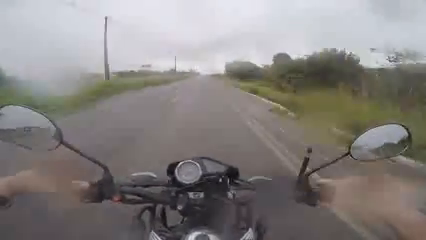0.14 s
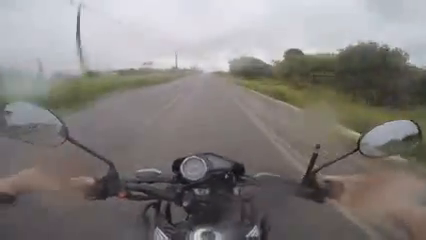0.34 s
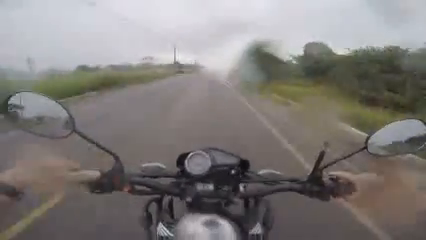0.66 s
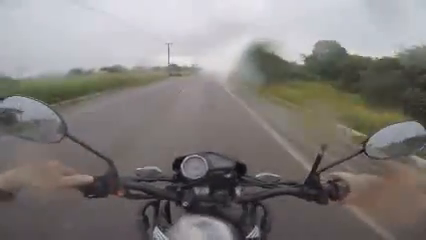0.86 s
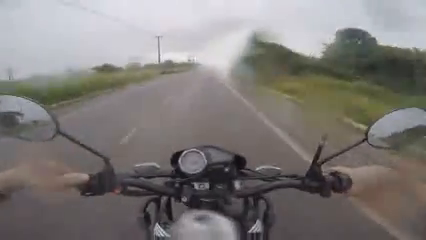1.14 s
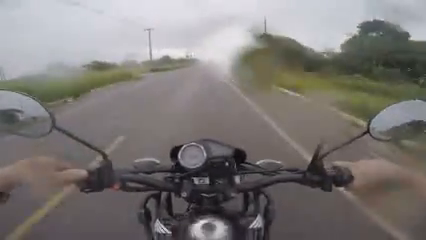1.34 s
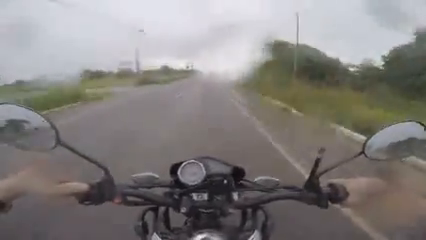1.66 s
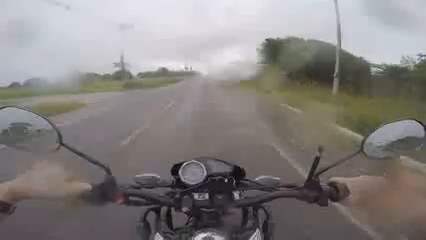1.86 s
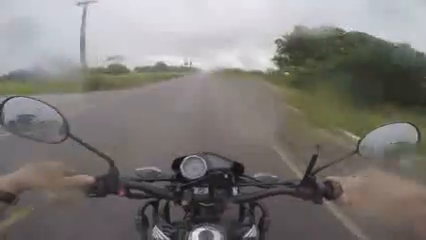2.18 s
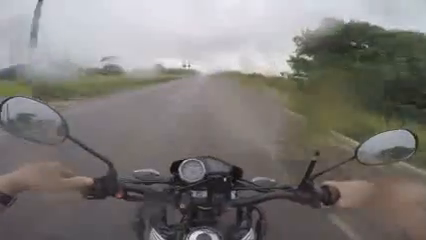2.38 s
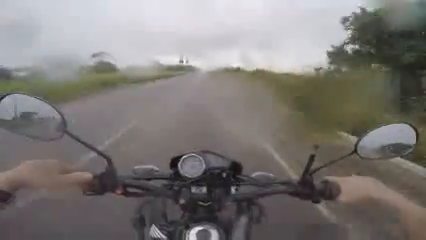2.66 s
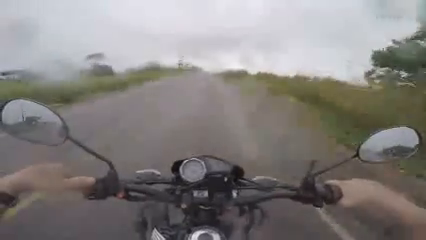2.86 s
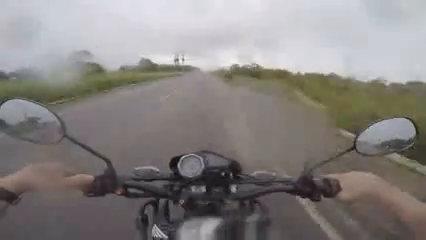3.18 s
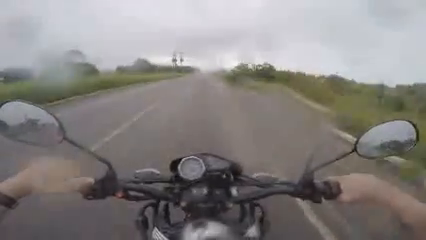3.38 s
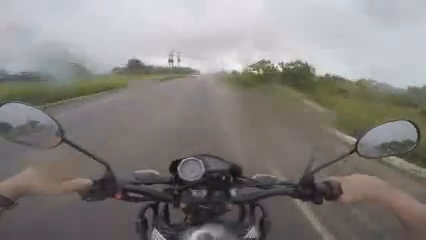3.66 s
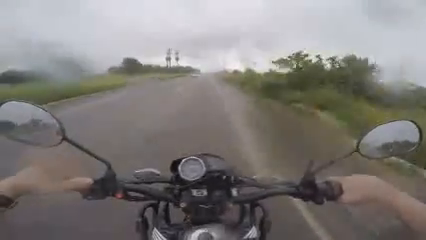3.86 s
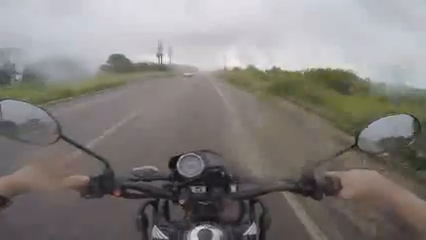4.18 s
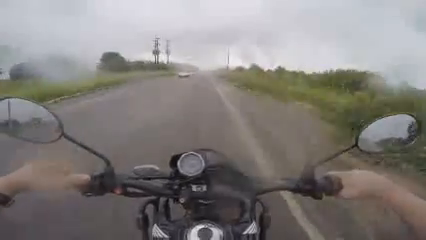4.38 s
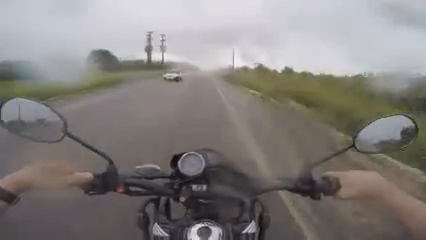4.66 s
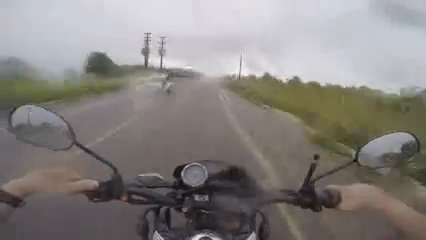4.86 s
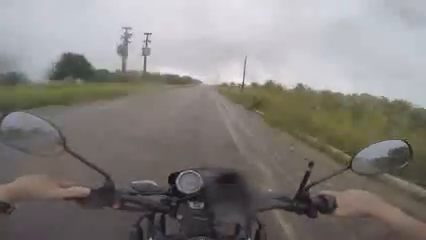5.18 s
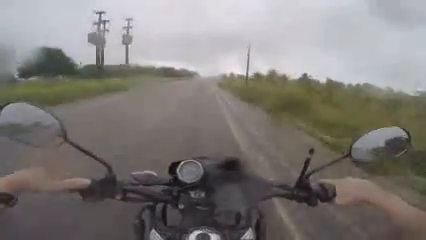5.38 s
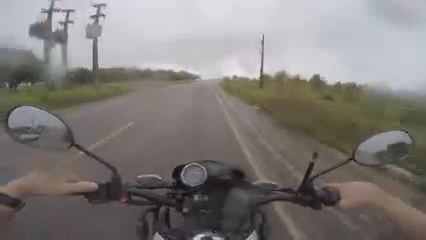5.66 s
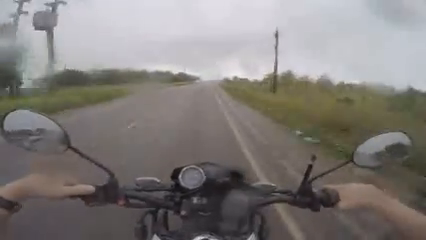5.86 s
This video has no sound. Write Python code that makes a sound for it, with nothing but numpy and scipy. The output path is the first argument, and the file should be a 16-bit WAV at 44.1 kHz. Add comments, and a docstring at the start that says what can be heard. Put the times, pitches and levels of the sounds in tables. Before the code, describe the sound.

Heard from a plastic case on a motorcyclist's chest, air and wet tyres rush continuously while wind thumps low. A single-cylinder engine drones steadily beneath a thin gear whine. Dense rain spatters the case with sharp smacks, short wet rings and dull knocks. Three times the background briefly muffles as water covers the microphone, leaving heavy drops clicking through.

```python
"""On a wet road in the rain, a single-cylinder motorcycle cruises, heard from a plastic case on the rider's chest.
Air and wet tyres rush as shaped noise, wind buffets the case, and exhaust harmonics drone under a thin gear whine.
Raindrops smack on the case as noise bursts through its resonances, each with a short wet ring and a knock.
Three times all but the heaviest drops and a faint hiss dips, as if a film of water covered the microphone port."""
import sys
import numpy as np
from scipy import signal
from scipy.fft import rfft, irfft, next_fast_len
from scipy.io import wavfile

SR = 44100
rng = np.random.default_rng(int(sys.argv[2]) if len(sys.argv) > 2 else 0)


def unload_wav(signal):
    """Save mono or channel-first audio to the path in sys.argv[1] as 16-bit WAV at rate SR, clipped to [-1, 1]."""
    wavfile.write(
        sys.argv[1],
        SR,
        np.round(np.clip(np.atleast_2d(signal).T, -1, 1) * 32767).astype(np.int16),
    )


N = 265923
TIME = np.arange(N) / SR


def from_db(db):
    """Decibels to gain."""
    return 10 ** (np.asarray(db) / 20)


def rms_one(x):
    """Each row scaled to rms 1."""
    return x / np.sqrt(np.mean(x ** 2, axis=-1, keepdims=True) + 1e-20)


def curve(points):
    """A breakpoint curve, one value per sample."""
    seconds, values = np.transpose(points)
    return np.interp(TIME, seconds, values)


def drift(rate_hz):
    """Slow random movement of rms 1: noise through two equal low-pass poles, made at every 40th sample."""
    pole = np.exp(-2 * np.pi * rate_hz * 40 / SR)
    noise = rng.standard_normal(N // 40 + 2002)
    slow = signal.lfilter([1], [1, -2 * pole, pole ** 2], noise)[2000:]   # skip the filter's start
    return np.interp(np.arange(N) / 40, np.arange(len(slow)), rms_one(slow))


def coloured_noise(spectrum):
    """Noise of rms 1, shaped by a spectrum that is interpolated over log frequency."""
    hz, db = np.transpose(spectrum)
    size = next_fast_len(N)
    bins_hz = np.maximum(np.fft.rfftfreq(size, 1 / SR), 1)
    gain = from_db(np.interp(np.log(bins_hz), np.log(hz), db))
    return rms_one(irfft(rfft(rng.standard_normal(size)) * gain, size)[:N])


def treble_above(x, hz):
    """The treble above hz, in phase with the source so that it can be mixed back in."""
    return signal.sosfiltfilt(signal.butter(2, hz, "high", fs=SR, output="sos"), x)


def swell(t, rise_s, decay_s):
    """An envelope that rises exponentially to time zero, then decays exponentially."""
    return np.exp(np.minimum(t / rise_s, -t / decay_s))


def place(seconds, sounds):
    """Short sounds summed onto the time line."""
    at = np.round(seconds * SR).astype(int)
    inside = (at >= 0) & (at < N)
    return np.bincount(at[inside], sounds[inside], N)


# faint even hiss: (frequency [Hz], relative density [dB per Hz])
HISS_SPECTRUM = [(300, 1), (2400, -21), (5000, 8), (8000, 8), (13000, 1)]


def hiss(level_db):
    """Steady shaped noise under the scene."""
    return from_db(level_db) * coloured_noise(HISS_SPECTRUM)


# air and tyres on the wet road, also the colour of the valve clatter:
# (frequency [Hz], relative density [dB per Hz])
RUSH_SPECTRUM = [(200, -3.5), (480, -9), (640, -4.5), (860, 1), (1050, -1.5), (1300, 3.5), (1950, -4),
                 (2550, 1.5), (2950, -9), (3500, -11.5), (4500, -11.5), (6000, -18.5), (8000, -25.5),
                 (13000, -25.5)]


def rush(level_db, vary_db, treble_vary_db):
    """Air and wet tyres hiss with random flutter; the treble varies in level more strongly."""
    noise = coloured_noise(RUSH_SPECTRUM)
    treble_gain = rms_one(from_db(treble_vary_db * np.tanh(drift(107))))
    uneven = noise + (treble_gain - 1) * treble_above(noise, 4500)
    return from_db(level_db + vary_db * drift(95)) * uneven


# wind on the case: (frequency [Hz], relative density [dB per Hz])
BUFFET_SPECTRUM = [(20, -44), (50, -8.5), (68, -6.5), (88, 2), (118, -9.5), (155, -22), (202, -10),
                   (260, -20), (450, -27), (900, -33), (4000, -80)]
# slow pressure swings behind the handlebars: (frequency [Hz], relative density [dB per Hz])
THROB_SPECTRUM = [(10, -33), (22, -13.5), (34, -6.5), (46, -11.5), (65, -25.5), (120, -38), (400, -80)]
# rise and fall of the deep throb: (time [s], level [dB])
THROB_LEVEL_CURVE = [(0, -23), (.38, -21), (.75, -31), (1.05, -27), (1.4, -30.5), (1.63, -36), (1.88, -26),
                     (2.15, -30), (2.6, -30.5), (2.9, -33), (3.45, -29.5), (4.0, -36), (4.24, -23.5),
                     (4.5, -31), (5.3, -26), (6.03, -31)]


def wind(buffet_db, lumpy_db):
    """Eddies thump against the case as lumpy low noise, over a deep throb with softly flattened peaks."""
    throb = rms_one(np.tanh(0.7 * coloured_noise(THROB_SPECTRUM)))
    buffet = from_db(buffet_db + lumpy_db * drift(30)) * coloured_noise(BUFFET_SPECTRUM)
    return from_db(curve(THROB_LEVEL_CURVE)) * throb + buffet


# gear whine before its small random wobble: (time [s], pitch [Hz])
WHINE_PITCH = [(0, 2131), (.6, 2146), (3.3, 2143), (4.2, 2158), (6.03, 2122)]
# exhaust drone: (multiple of the firing rate, relative level before waver [dB])
DRONE_HARMONICS = [(1, -44.5), (2, -37), (4, -49), (5, -54.5), (6, -51.5), (7, -56), (10, -49.5), (13, -59),
                   (14, -56)]
TEETH_PER_FIRING = 40


def engine(drone_db, whine_db, clatter_db, waver_db):
    """Exhaust harmonics, a gear whine locked to them, and valve clatter at every firing."""
    whine_hz = curve(WHINE_PITCH) * (1 + 0.00205 * drift(11))
    firing_phase = 2 * np.pi * np.cumsum(whine_hz) / TEETH_PER_FIRING / SR
    drone = 0
    for multiple, db in DRONE_HARMONICS:
        phase = round(multiple) * firing_phase + rng.uniform(0, 2 * np.pi)
        drone = drone + from_db(db + waver_db * drift(16)) * np.sin(phase)
    whine = from_db(whine_db + waver_db * drift(24)) * np.sin(TEETH_PER_FIRING * firing_phase)
    pulse = ((1 + np.cos(firing_phase)) / 2) ** 4
    clatter = rms_one(coloured_noise(RUSH_SPECTRUM) * pulse)
    tones = np.sqrt(2) * (from_db(drone_db) * drone + whine)   # sine levels are rms
    return tones + from_db(clatter_db) * clatter


# resonances of the case: (frequency [Hz], width [Hz], mean relative level [dB])
CASE_MODES = [(868, 185, -14), (1380, 167, -13), (2528, 191, 1), (3187, 135, -2.5), (3950, 536, 0.5),
              (4703, 438, 2), (5570, 650, -6.5), (7275, 610, -7), (8960, 1000, -10.5), (11880, 1620, -12)]


def case(force, vary_db):
    """The case rings in its resonances; each row of force strikes another spot, with another mix of them."""
    out = 0
    for k, (hz, width_hz, db) in enumerate(CASE_MODES):
        r = np.exp(-np.pi * width_hz / SR)
        poles = [1, -2 * r * np.cos(2 * np.pi * hz / SR), r * r]
        mode = (1 - r * r) / 2 * signal.lfilter([1, 0, -1], poles, force + 1e-18)
        mix = from_db(db + vary_db * rng.standard_normal((len(force), 1)))
        out = out + (-1) ** k * mode * mix   # neighbouring modes in opposite phase
    return out


def splashes(t, count, rise_s, decay_s, scatter_db, scatter_s, vary_db):
    """Each drop bursts on the case as a sharp noise smack inside a longer spatter; treble scaled to spread 1."""
    wetness = from_db(2.5 * rng.standard_normal((count, 1)))
    spatter = wetness * from_db(scatter_db) * swell(t, scatter_s, scatter_s)
    shape = swell(t, rise_s, decay_s) + spatter
    sound = case(shape * rng.standard_normal((count, len(t))), vary_db)
    treble = signal.sosfilt(signal.butter(2, 3300, "high", fs=SR, output="sos"), sound)
    return sound / np.std(treble, axis=1, keepdims=True)


def fine_spray(level_db, spread_db, bright_db, count):
    """Many small droplets patter at random, with lifted treble."""
    chance = rng.random((count, 2))
    s = chance[:, :1] * TIME[-1]
    t = np.arange(-128, 192) / SR
    size = from_db(np.interp(s, TIME, level_db) - spread_db * np.sqrt(chance[:, 1:]))
    droplets = splashes(t, count, rise_s=0.0003, decay_s=0.00042,
                        scatter_db=-4.5, scatter_s=0.0017, vary_db=6.5)
    patter = place(s + t, size * droplets)
    return patter + (from_db(bright_db) - 1) * treble_above(patter, 7000)


# lighter drops: mean smack and ring before airstream and water film, and the full range of sizes
LIGHT_SMACK_DB, LIGHT_RING_DB, LIGHT_RANGE_DB = -16, -18.5, 6.5


def light_drops(level_db, count):
    """Rows of time, smack and ring for lighter drops, one at a random moment in each equal slice of time."""
    chance = rng.random((count, 3))
    s = (np.arange(count) + chance[:, 0]) / count * TIME[-1]
    size_db = np.interp(s, TIME, level_db)[:, None] + LIGHT_RANGE_DB * (chance[:, 1:] - .5)
    return np.column_stack([s, size_db + [LIGHT_SMACK_DB, LIGHT_RING_DB]])


# the heaviest drops that hit the case:
# (listed time [s], relative smack level [dB], relative ring and knock level [dB])
HEAVY_DROPS = [(0.2182, 0, -10), (0.2837, -6.5, -21), (0.3068, -2.5, -11), (0.3614, -4, -5),
               (0.4114, -10, -7), (0.4187, -4.5, -8), (0.4508, -0.5, -16), (0.4628, 0, -14),
               (0.4803, 2, -3), (0.7721, -9, -14), (0.8095, 0.5, -6), (0.842, 1.5, -17),
               (0.9736, -6, -17.5), (1.068, 1, -6.5), (1.0724, -2.5, -7.5), (1.0858, -10, -15),
               (1.4139, -3.5, -12.5), (1.4204, -1, -19), (1.4345, -3.5, -11.5), (1.529, -7.5, -33),
               (1.6544, -11, -25), (1.737, -3, -27), (1.7677, -18, -18), (1.9505, -3, -25),
               (1.9605, -3, -12.5), (2.0273, -3.5, -10), (2.0363, -10, -24), (2.0904, -2, -20),
               (2.1091, -1.5, -10), (2.1146, 1.5, -31), (2.2657, -4.5, -10), (2.339, 0, 0),
               (2.3535, -4.5, -9), (2.389, -13, -23), (2.4188, -4.5, -20), (2.5238, -1.5, -39),
               (2.6729, -7, -10), (2.6942, 0, -13), (2.7103, 0.5, -9), (2.7244, -4.5, -10),
               (2.7786, -5.5, -15.5), (2.795, -10, -34), (2.8345, -8, -36), (2.9674, -7, -27),
               (3.0078, -6.5, -17), (3.0595, -4.5, -27), (3.0729, -3.5, -8), (3.1612, 0.5, -9),
               (3.2088, -4.5, -16), (3.2675, -7, -18), (3.2823, -1, -18), (3.3097, -3.5, -4),
               (3.3224, -5, -11), (3.3438, -1.5, -16), (3.4264, -7.5, -33), (3.4939, -6, -12.5),
               (3.5897, -2.5, -8.5), (3.6277, -10.5, -10.5), (3.667, -7.5, -11), (3.7388, -4, -12.5),
               (3.8085, -6.5, -19), (3.856, -2, -32), (3.926, -4.5, -9.5), (3.9424, -5, -8),
               (3.9853, -6.5, -25), (4.0971, -3, -12), (4.2073, -2.5, -15), (4.236, -4, -19),
               (4.2943, 4, -10.5), (4.3018, -10, -15.5), (4.3335, -12.5, -17.5), (4.5765, -6.5, -34),
               (4.6576, -8.5, -28), (4.7046, -2.5, -12), (4.7724, -1, -13.5), (4.9655, -20, -10.5),
               (5.1113, -0.5, -10), (5.1816, -2, -11), (5.22, -4.5, -29), (5.3018, -10, -13),
               (5.3087, -2, -9), (5.3172, -2.5, -9.5), (5.3704, -3, -14), (5.4108, -5, -21),
               (5.4291, 2.5, -17), (5.4365, -2, -9), (5.4983, -7.5, -18), (5.5291, -5, -9.5),
               (5.5935, -7, -33), (5.619, -7.5, -15), (5.663, -14, -9), (5.7049, -11, -16),
               (5.7197, 0, -20), (5.7989, -7.5, -18), (5.8778, 1, -11.5), (5.9445, -2, -12),
               (5.9825, 1.5, -10.5), (6.0117, -4, -8)]
PEAK_DELAY_S = .0012   # fixed delay from the listed time to the peak of the smack
RING_HZ, RING_SPREAD_OCTAVES = 2585, 0.093   # middle pitch of the wet ring, and its spread among drops
KNOCK_GROWTH = 0.39   # extra dB of knock per dB of ring: heavy drops shake the whole shell


def raindrops(light, splash_db, ring_db, thud_db):
    """A smack on the case and a short wet ring at a pitch of its own; heavy drops also knock the shell."""
    s, smack_db, own_db = np.vstack([HEAVY_DROPS, light]).T[:, :, None]
    t = np.arange(-192, 320) / SR
    bursts = splashes(t, len(s), rise_s=0.000083, decay_s=0.000046,
                      scatter_db=-5, scatter_s=0.0013, vary_db=3.5)
    smack = from_db(smack_db + splash_db) * bursts
    hz = RING_HZ * 2 ** (RING_SPREAD_OCTAVES * rng.standard_normal(s.shape))
    ring_shape = swell(t, .0005, 3 / hz)   # decay time constant of three cycles
    ring = from_db(ring_db) * ring_shape * np.sin(2 * np.pi * hz * t)
    shell = signal.butter(2, [800, 2700], "band", fs=SR, output="sos")
    knock = swell(t, 0.00074, 0.0016) * rng.standard_normal(smack.shape)
    knock = rms_one(signal.sosfilt(shell, signal.sosfilt(shell, knock)))
    thud = from_db(thud_db + KNOCK_GROWTH * own_db) * knock
    return place(s + PEAK_DELAY_S + t, smack + from_db(own_db) * (ring + thud))


# water covers the port: (start [s], end [s], depth [dB])
WATER_FILMS = [(0.482, 0.71, -18), (2.114, 2.218, -15.5), (4.305, 4.44, -15.5)]
FILM_CLOSE_S, FILM_CLEAR_S = 0.013, 0.017   # time constants


def muffling():
    """Level change in dB as a film of water closes over the port, holds, then is blown clear."""
    total_db = 0
    for start, end, depth_db in WATER_FILMS:
        closing = 1 - np.exp(-np.maximum(TIME - start, 0) / FILM_CLOSE_S)
        clearing = np.exp(-np.maximum(TIME - end, 0) / FILM_CLEAR_S)
        total_db = total_db + depth_db * closing * clearing
    return total_db


def spread_treble(sound):
    """Nearly mono sound; the top treble is spread between left and right by slow random movement."""
    steep = signal.ellip(6, .5, 60, 5000, "high", fs=SR, output="sos")
    side = from_db(-10) * signal.sosfilt(steep, sound * np.tanh(2 * drift(150)))
    return np.array([sound + side, sound - side])


# strength of the airstream, which drives rush, buffeting, spray and lighter drops: (time [s], level [dB])
AIRSTREAM_CURVE = [(0, 0), (.34, 3), (.8, -3.5), (1.05, -2), (1.6, -5.5), (1.95, 1), (2.3, -2),
                   (2.65, -1.5), (2.85, -4), (3.15, -2), (3.75, -3), (4.17, 0.5), (4.55, -1.5), (5.05, 3.5),
                   (5.5, 1), (6.03, 1)]
RUSH_DB, BUFFET_DB, SPRAY_DB = -27.5, -29.5, -21   # base levels where the airstream is at 0 dB
BUFFET_FOLLOWS, SPRAY_FOLLOWS = 0.7, 0.75   # share of the airstream's swing
SPRAY_MUFFLED = 0.9   # share of the muffling that the spray suffers


def scene():
    """Wind, road, engine and rain at the case; the heaviest drops sound through any film of water."""
    air_db = curve(AIRSTREAM_CURVE)
    muffle_db = muffling()
    air = rush(RUSH_DB + air_db, vary_db=2, treble_vary_db=16)
    air = air + wind(BUFFET_DB + BUFFET_FOLLOWS * air_db, lumpy_db=2)
    motor = engine(drone_db=-1.5, whine_db=-40.5, clatter_db=-33, waver_db=3)
    spray_db = SPRAY_DB + SPRAY_FOLLOWS * air_db + SPRAY_MUFFLED * muffle_db
    spray = fine_spray(spray_db, spread_db=15, bright_db=2, count=640)
    light = light_drops(SPRAY_FOLLOWS * air_db + muffle_db, count=100)
    drops = raindrops(light, splash_db=-15.5, ring_db=2, thud_db=-9.5)
    return spread_treble(from_db(muffle_db) * (air + motor) + spray + drops + hiss(-55))


def record(dry):
    """The hardest drops overload the input, squashing both channels alike; the top is cut at 12.9 kHz."""
    ceiling = .95
    limited = dry / (1 + (dry.mean(axis=0) / ceiling) ** 6) ** (1 / 6)
    top_cut = signal.ellip(10, .1, 70, 12900, fs=SR, output="sos")
    return signal.sosfilt(top_cut, ceiling * limited)


dry = scene()
out = record(dry)
unload_wav(out)
```